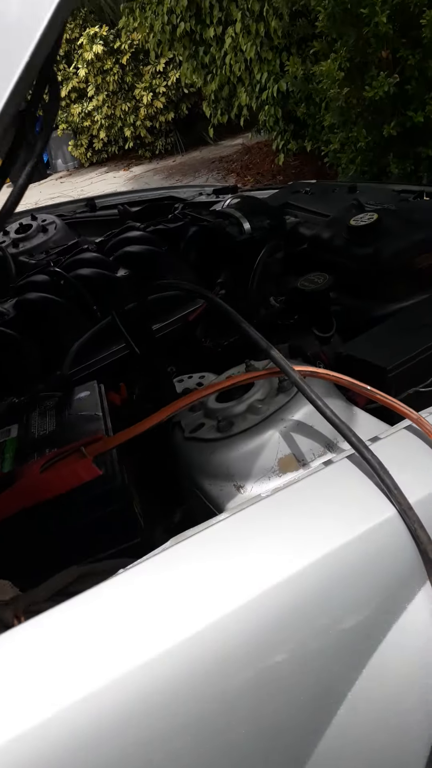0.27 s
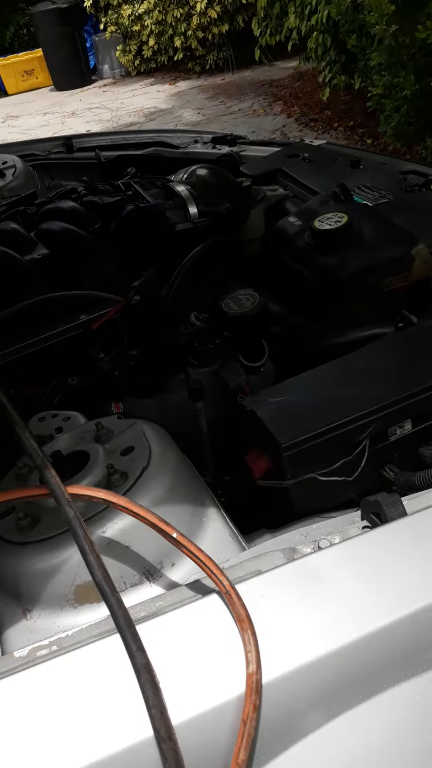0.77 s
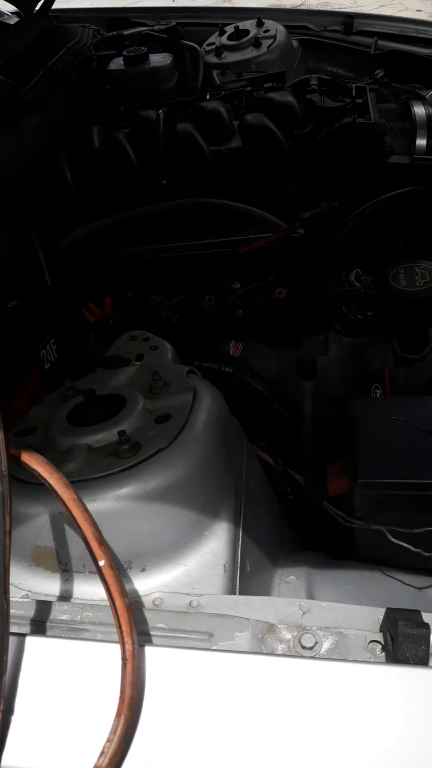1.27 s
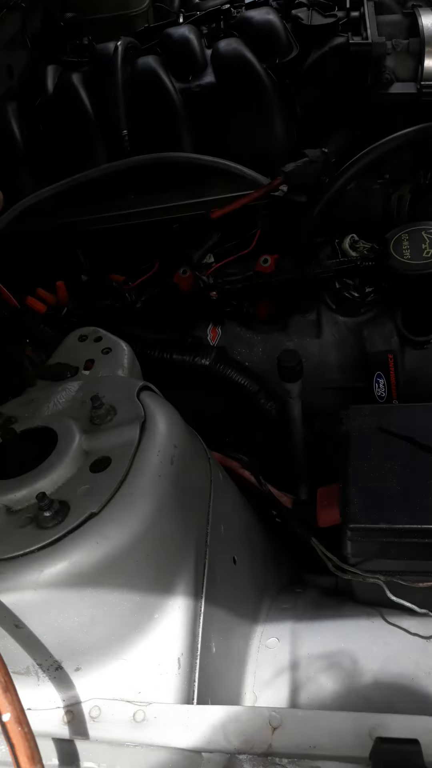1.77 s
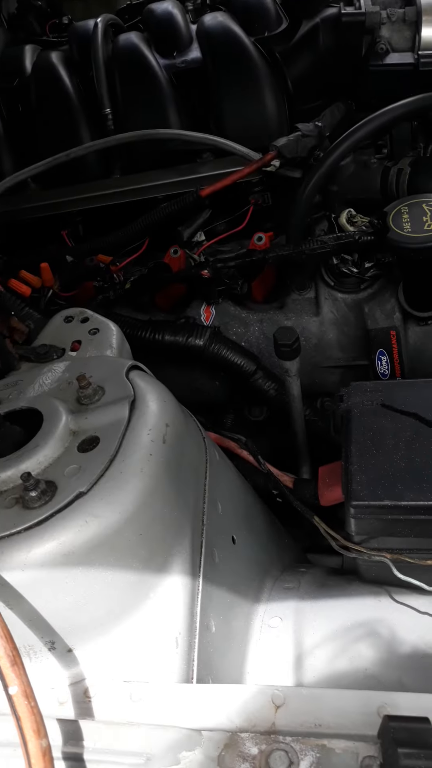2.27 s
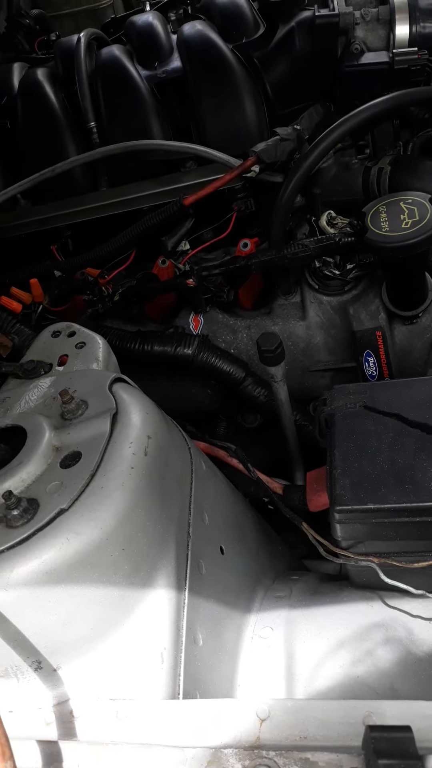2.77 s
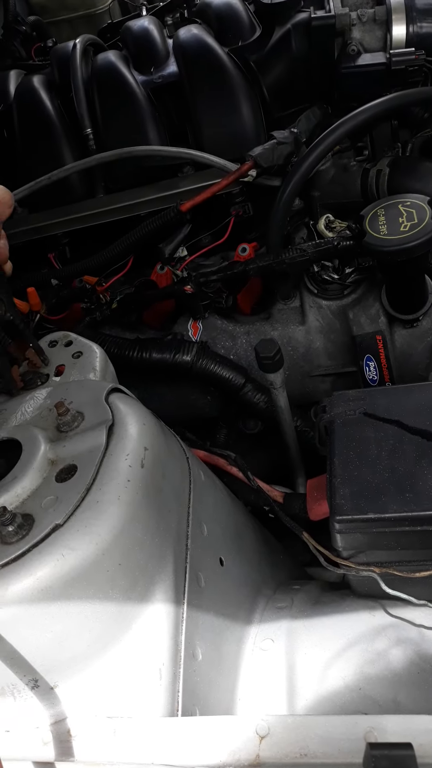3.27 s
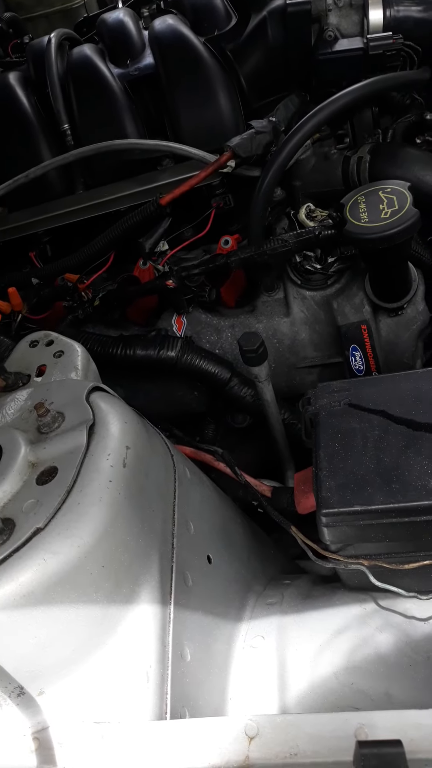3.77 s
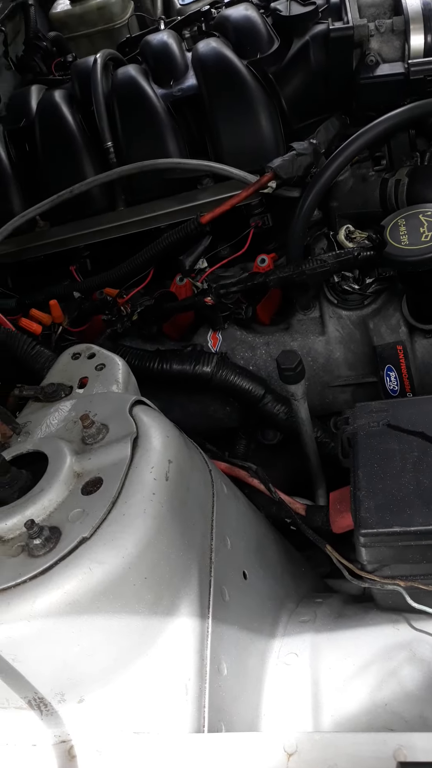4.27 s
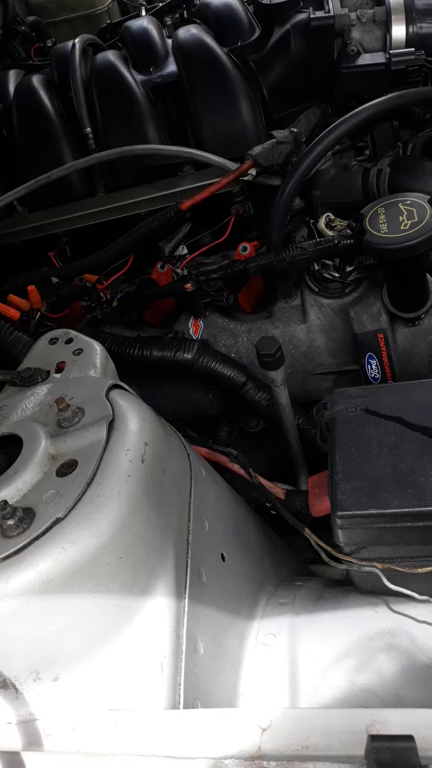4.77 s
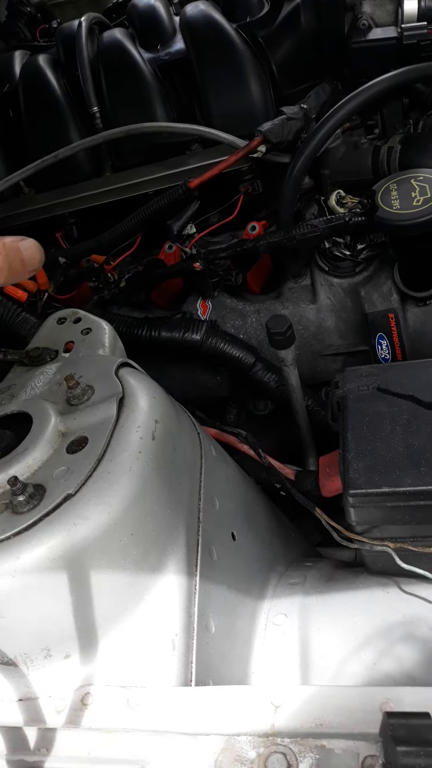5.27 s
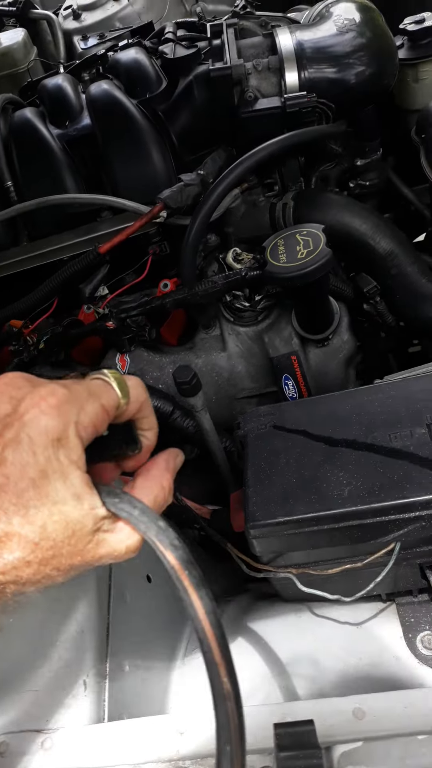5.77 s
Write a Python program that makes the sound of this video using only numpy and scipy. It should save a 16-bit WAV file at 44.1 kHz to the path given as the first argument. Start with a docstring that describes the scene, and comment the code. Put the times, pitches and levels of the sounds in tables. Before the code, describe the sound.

Heard first from beside a parked car and then from just over its open engine bay, a big engine idles with a loping bass rumble. Small metallic clinks come at the start, while valve rasp, fine ticks and faint belt squeaks sit above the throb. Near the end a single sharp, close click cuts through, after which the idle turns noticeably quieter for a moment before returning.

```python
"""A deep, loping throb comes first: a V8 idling near 720 rpm in a driveway, heard from beside the car.
Eight unequal firings boom through the body six times a second; the block clatters, valves rasp,
injectors tick and the belt sings. Loose leads and clips clink as the microphone moves in over the fender
and settles under the open hood. At 4.55 s one sharp click sounds close by; after it the engine's sound
sinks by about 10 dB for a second and comes back."""
import sys
import numpy as np
from scipy import signal
from scipy.fft import rfft, irfft, next_fast_len
from scipy.io import wavfile
from scipy.ndimage import uniform_filter1d, minimum_filter1d

SR = 44100
rng = np.random.default_rng(int(sys.argv[2]) if len(sys.argv) > 2 else 0)


def master(y):
    """Save y as 16-bit WAV."""
    cut = np.clip(np.atleast_2d(y).T, -1, 1)
    pcm = np.round(cut * 32767)  # scale
    wavfile.write(sys.argv[1], SR, pcm.astype(np.int16))


N = 264908
TIME = np.arange(N) / SR


def amp(db):
    """Decibels to gain."""
    return 10 ** (np.asarray(db) / 20)


def unit(x):
    """x scaled to rms 1."""
    return x / np.sqrt(np.mean(x ** 2) + 1e-20)


def along(points, hz):
    """(f/Hz, value) points read on a log frequency axis."""
    freqs, values = np.transpose(points)
    return np.interp(np.log(hz + 1), np.log(freqs + 1), values)


def filtered(x, response):
    """x through a complex frequency response."""
    size = next_fast_len(x.shape[-1] + SR // 2)
    hz = np.fft.rfftfreq(size, 1 / SR)
    return irfft(rfft(x, size) * response(hz), size)[..., :x.shape[-1]]


def coloured(x, spectrum):
    """x shaped by (f/Hz, level/dB) points, at rms 1."""
    return unit(filtered(x, lambda hz: amp(along(spectrum, hz))))


def resonate(x, modes):
    """x rung through (f/Hz, width/Hz, level/dB) resonances of alternating sign, at rms 1."""
    def response(hz):
        return sum((-1) ** k * amp(db) * 1j * hz * width / (centre ** 2 - hz ** 2 + 1j * hz * width)
                   for k, (centre, width, db) in enumerate(modes))
    return unit(filtered(x, response))


def noise():
    """Two unrelated white noises."""
    return rng.standard_normal((2, N))


def fuzzy_tone(pitch_hz, width_hz):
    """A narrow band of noise around a steady or moving pitch."""
    flutter = signal.sosfilt(signal.butter(3, width_hz, fs=SR, output="sos"), noise() + 1j * noise())
    phase = 2 * np.pi * np.cumsum(np.broadcast_to(pitch_hz, N)) / SR
    return unit((flutter * np.exp(1j * phase)).real)


def dying(impulses, t60):
    """An envelope that jumps at each impulse and decays."""
    return signal.lfilter([1], [1, -np.exp(-np.log(1000) / (t60 * SR))], impulses)


def fade(start_s, t60):
    """An envelope that jumps to 1 at start_s and decays."""
    age = TIME - start_s
    return (age >= 0) * np.exp(-np.log(1000) * np.abs(age) / t60)


ARRIVE_S = 1.25  # the microphone's move in over the fender


def away():
    """Microphone distance: 1 beside the car, 0 over the bay; each far_ setting applies in full at 1."""
    return np.clip(1 - TIME / ARRIVE_S, 0, 1)


# The slowly hunting idle: t/s, crank speed/rpm
IDLE_SPEED = [(0, 709.4), (1, 721.8), (1.8, 718.1), (2.3, 715.3), (2.9, 723.4), (4.3, 723.6), (5.4, 711.9),
              (6, 727.1)]


def crank(start_deg=-23):
    """Four-stroke cycles completed at each sample; one cycle is two turns."""
    rpm = np.interp(TIME, *np.transpose(IDLE_SPEED))
    return start_deg / 720 + np.cumsum(rpm) / 120 / SR


def strikes(cycle, deg, db, scatter_db, jitter_deg):
    """An impulse for each cylinder in each cycle, deg into its slot; slots are a quarter turn apart."""
    slots_deg = np.arange(8) * 90
    laps = np.arange(np.floor(cycle[0]) - 1, np.ceil(cycle[-1]) + 1)[:, None]
    late, loud = rng.standard_normal((2, len(laps), len(slots_deg)))
    due = laps + (slots_deg + deg + jitter_deg * late) / 720
    heard = (due > cycle[0]) & (due < cycle[-1])
    samples = np.searchsorted(cycle, due[heard])
    return np.bincount(samples, amp(db + scatter_db * loud)[heard], len(cycle))


# Cylinders in firing order, levels relative: boom lag/deg, boom/dB, injector tick/dB, valve rasp/dB
CYLINDERS = [(1.5, -2.5, 10.5, -11), (0.9, 3, -31, -7), (11.5, -9.5, -1, 2), (1.7, 1, 7.5, -11.5),
             (-3, -0.65, -11, -9), (0.3, -3, 8.5, -2), (-1.1, 1.5, 7, -14), (4.5, 1.6, -7, -4.5)]
# Resonances of exhaust, intake and engine bay: f/Hz, width/Hz, relative level/dB
BODY_MODES = [(50.2, 4.7, -40.5), (95.8, 10, -36), (133.7, 6.73, -14.5), (136.94, 19.92, -20.5),
              (155.6, 7.11, -19), (191.2, 8.7, -38.5), (229.95, 5.45, -27.5), (273.1, 8.7, -38.5),
              (295.5, 12, -44.5), (355.4, 9.6, -41), (380.6, 9.4, -45.5), (427, 9.4, -54), (475, 6.2, -76),
              (519.6, 15, -58.5)]


def combustion(cycle, fire_deg=29, level_db=-9.5, far_db=-3, far_throb_db=11, left_lead_s=.00012):
    """Unequal firings ring the body; their pattern makes the lope, and it throbs most beside the car."""
    lag_deg, db, _, _ = np.transpose(CYLINDERS)
    run_up = cycle[0] - np.arange(SR, 0, -1) * (cycle[1] - cycle[0])  # the engine is already running
    turning = np.concatenate([run_up, cycle])
    firings = strikes(turning, fire_deg + lag_deg, db, scatter_db=1, jitter_deg=.93)
    direct = resonate(firings, BODY_MODES)
    # firings that come round under the car are blurred and reach the microphone's two ports out of step
    blurred = strikes(turning, fire_deg + lag_deg, db, scatter_db=0, jitter_deg=7.2)
    under_car = amp(-14.5) * resonate(blurred, BODY_MODES)
    side = filtered(under_car, lambda hz: 1j * hz / (hz + 60))
    # the direct boom reaches the left port first
    ports = filtered(direct, lambda hz: np.exp(1j * np.pi * left_lead_s * np.outer([1, -1], hz)))
    boom = ports + np.array([side, -side])
    throb = filtered(boom, lambda hz: 1 / (1 + (hz / 70) ** 8))
    boom = boom[:, SR:] + (amp(far_throb_db * away()) - 1) * throb[:, SR:]
    return amp(level_db + far_db * away()) * boom


def shaking(cycle, locked):
    """Chain and cams shake alike in every cycle (the locked share); the rest is chance."""
    patterns = rng.standard_normal((2, SR // 6))
    place = np.linspace(0, 1, patterns.shape[1], endpoint=False)
    repeated = np.array([np.interp(cycle % 1, place, pattern) for pattern in patterns])
    return np.sqrt(locked) * unit(repeated) + np.sqrt(1 - locked) * noise()


# Clatter through the block, from over the bay: f/Hz, relative level/dB
BLOCK_SPECTRUM = [(30, -8.5), (200, 20.5), (400, 6), (600, -8.5), (950, 2), (1300, 5.5), (1780, 6.5),
                  (2000, -4.5), (2800, -13), (4000, -83), (9000, -50)]
# Ringing of covers and brackets: f/Hz, width/Hz, relative level/dB
COVER_MODES = [(200.6, 8.6, 3.5), (251.8, 10.5, 10.5), (314, 10.6, 4), (352.7, 14, 4), (521, 13.4, 4),
               (671.8, 12, -5.5), (797.3, 16.5, -10.5), (896.4, 12.6, -9), (1221, 30, -8.5),
               (1443, 21, -12.5), (1666, 29, -8.5)]


def clatter(cycle, block_db=-28, covers_db=-24, far_block_db=-3, far_covers_db=-7):
    """The shaking sounds through the block and rings the covers; the fender screens both at first."""
    block = coloured(shaking(cycle, locked=.47), BLOCK_SPECTRUM)
    covers = resonate(shaking(cycle, locked=.34), COVER_MODES)
    # the engine rocks once a cycle and shakes the big, low-ringing covers harder
    rock_db, peak_deg, big_below_hz = 4.5, 660, 290
    rocking = amp(rock_db * np.cos(2 * np.pi * (cycle - peak_deg / 720)))
    big_covers = filtered(covers, lambda hz: 1 / (1 + (hz / big_below_hz) ** 16))
    covers = covers + (rocking - 1) * big_covers
    return (amp(block_db + far_block_db * away() ** 2) * block
            + amp(covers_db + far_covers_db * away()) * covers)


# Hiss and valve rasp under the hood: f/Hz, relative level/dB
RASP_SPECTRUM = [(1200, -5), (2200, 2.5), (2900, 3), (3400, 0), (3800, 2.5), (4030, 0), (4300, 0.5),
                 (5200, -3), (7300, -1.5), (8500, -17), (11000, -13.5), (16000, -10.5)]


def valves(cycle, shut_deg=20, level_db=-34.5):
    """Each valve adds a short rasp to the steady hiss of belt and intake."""
    _, _, _, db = np.transpose(CYLINDERS)
    shuts = strikes(cycle, shut_deg, db, scatter_db=1.1, jitter_deg=5)
    bursts = amp(2) * dying(shuts, t60=.14)
    hiss = coloured(noise(), RASP_SPECTRUM)
    return amp(level_db) * unit(hiss * np.sqrt(1 + bursts ** 2))


# An injector's tick at close range: f/Hz, relative level/dB
TICK_SPECTRUM = [(2000, -27), (5000, -18), (7500, 9.5), (9000, -9), (12000, -1), (14500, 2), (15700, 11.5)]


def injectors(cycle, seat_deg=22, open_deg=25, lift_db=-7, level_db=-40):
    """Each needle ticks softly as it lifts and harder as it seats."""
    _, _, db, _ = np.transpose(CYLINDERS)
    lifts = strikes(cycle, seat_deg - open_deg, db + lift_db, scatter_db=1, jitter_deg=1)
    seats = strikes(cycle, seat_deg, db, scatter_db=1, jitter_deg=1)
    return amp(level_db) * coloured(noise() * dying(lifts + seats, t60=.018), TICK_SPECTRUM)


def bay_hollow(near_hz=546, far_rise_hz=139.6, level_db=-33.5):
    """The hollow tone of the bay falls in pitch and fades as the microphone comes near."""
    return amp(level_db) * np.sqrt(away()) * fuzzy_tone(near_hz + far_rise_hz * away(), width_hz=125)


# The belt's squeaks, after a faint second tone of the bay's hollow near 2.2 kHz in the first row: peak t/s,
# length/s, f/Hz, level/dB
SWELLING_TONES = [(.75, 1.1, 2188, -46), (0.797, 0.22, 1447, -34.5), (1.35, 0.74, 4030, -47),
                  (2.498, 2, 1670, -42), (4.297, .6, 3980, -48)]


def belt(whine_hz=4060, whine_db=-50.5):
    """A thin steady whine from the belt side, and tones that swell and die away: the belt's squeaks and a faint
    second ring of the bay's hollow."""
    out = amp(whine_db) * fuzzy_tone(whine_hz, width_hz=24)
    for peak_s, length_s, hz, db in SWELLING_TONES:
        swell = np.cos(np.pi * np.clip((TIME - peak_s) / length_s, -.5, .5))
        out += amp(db) * swell * fuzzy_tone(hz, width_hz=20)
    return out


def clip_clinks(per_s=26, centre_hz=3050, level_db=-30.5, t60=.085):
    """Loose clips chink at random, each on its own pitch, fading as the microphone comes to rest."""
    out = np.zeros((2, N))
    t = np.arange(SR // 8) / SR
    ring = amp(-60 * t / t60) * (1 - np.exp(-t / .001))
    for k in range(int(per_s * ARRIVE_S)):
        start = int((k + rng.random()) / per_s * SR)
        detune, loud = rng.standard_normal(2)
        hz = centre_hz * np.exp(.2 * detune)
        tone = np.sin(2 * np.pi * (hz * t + rng.random((2, 1))))
        out[:, start:start + len(t)] += amp(level_db + 2.5 * loud) * ring * tone
    return out * np.sqrt(away())


# Knocks of leads and clips in the bay: t/s, level/dB, f/Hz
LEAD_KNOCKS = [(.051, -33, 2600), (.387, -41, 6460), (.556, -34, 6450), (1.056, -35, 3500),
               (1.098, -33.5, 5070), (4.928, -39.5, 4200), (5.386, -42, 3040)]


def lead_rattles():
    """Leads and clips knock: short soft chinks of noise, each around its own pitch."""
    out = np.zeros((2, N))
    envelope = fade(0, t60=.18)[:SR // 4]
    for start_s, db, hz in LEAD_KNOCKS:
        spectrum = [(hz / 10, -25), (hz / 2, -10), (hz, 0), (hz * 2, -22)]
        chink = coloured(rng.standard_normal((2, len(envelope))), spectrum)
        start = round(start_s * SR)
        out[:, start:start + len(envelope)] += amp(db) * envelope * chink
    return out


# The click and its rebounds, close to the microphone: t/s, level/dB, t60/s
CLICK_BLOWS = [(4.5523, -13.5, .012), (4.5538, -12, .010), (4.5577, -12, .005)]
# The direct snap of the contact: f/Hz, relative level/dB
SNAP_SPECTRUM = [(300, -18), (1000, -6), (1700, -1), (2600, -4), (3500, 0), (4300, -4), (7000, -3),
                 (9000, -5), (15500, -3.5)]
# What the click rings with: f/Hz, width/Hz, relative level/dB
CLICK_MODES = [(2680, 130, -6), (3530, 260, 1), (4880, 110, -2), (5900, 130, -5), (7780, 130, -7)]
# Its scatter off the hood and bay: f/Hz, relative level/dB
ECHO_SPECTRUM = [(200, -8), (500, 5), (1500, 3), (4000, 0), (7300, 1), (8700, -9), (16000, -11)]


def click():
    """A hard contact snaps, rings and rebounds; the hood and bay scatter it."""
    blows = sum(amp(db) * fade(start_s, t60) for start_s, db, t60 in CLICK_BLOWS)
    snap = blows * coloured(noise(), SNAP_SPECTRUM)
    ring = amp(-47) * resonate(blows * noise(), CLICK_MODES)
    echo = amp(-19) * fade(4.557, t60=.15) * coloured(noise(), ECHO_SPECTRUM)
    return snap + ring + echo


def level_dip(start_s=4.565, end_s=5.585, depth_db=-11.3, sink_s=.28, recover_s=.31):
    """After the click the engine's level sinks slowly, stays low and swells back."""
    sunk = 1 - np.exp(-np.maximum(TIME - start_s, 0) / sink_s)
    held = np.exp(-(np.maximum(TIME - end_s, 0) / recover_s) ** 2)
    return amp(depth_db * sunk * held)


# How alike the microphone's two sides are: f/Hz, correlation (below 0 plays as 0)
STEREO_LIKENESS = [(60, 0.99), (130, 0.96), (290, 0.92), (640, 0.65), (1410, 0.17), (3100, -0.13),
                   (6820, -0.02), (15000, 0.03)]
# Balance at the microphone: f/Hz, left minus right level/dB
STEREO_LEAN = [(60, 0.5), (99, 0.5), (160, 1.0), (270, -1.5), (450, 0.0), (740, -1.5), (1220, 2.5),
               (2010, 3.5), (3330, 0.0), (5500, -2.0), (9080, 0.5), (15000, 0.0)]


def spread(pair):
    """Two unrelated signals become left and right: alike in the bass, leaning by frequency."""
    def mid_side_gains(hz):
        angle = np.arccos(np.clip(along(STEREO_LIKENESS, hz), 0, 1)) / 2
        return np.array([np.cos(angle), np.sin(angle)])
    mid, side = filtered(pair, mid_side_gains)
    left_right = np.array([mid + side, mid - side])
    return filtered(left_right, lambda hz: amp(np.outer([.5, -.5], along(STEREO_LEAN, hz))))


def scene(far_treble_db=-1):
    """The driveway at the microphone: the crank times the engine, and the small sounds lie on top."""
    cycle = crank()
    boom = combustion(cycle) * amp([[.3], [-.3]])  # a shade to the left
    treble = amp(far_treble_db * away()) * (valves(cycle) + injectors(cycle))
    bay = clatter(cycle) + treble + bay_hollow() + belt()
    small_sounds = lead_rattles() + clip_clinks() + click()
    dip = level_dip()
    return dip * boom + spread(dip * bay + small_sounds)


def record(dry, ceiling=.93, top_hz=15950):
    """A limiter eases the tallest swings of the boom; nothing is kept above top_hz."""
    needed = np.minimum(1, ceiling / np.abs(dry).max(axis=0))
    gain = uniform_filter1d(minimum_filter1d(needed, size=600), size=500)
    return filtered(dry * gain, lambda hz: hz < top_hz)


dry = scene()
out = record(dry)
master(out)
```